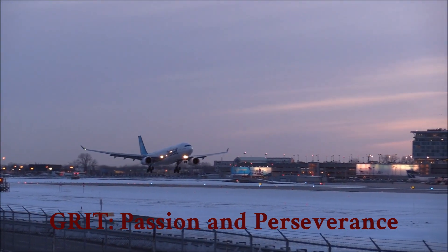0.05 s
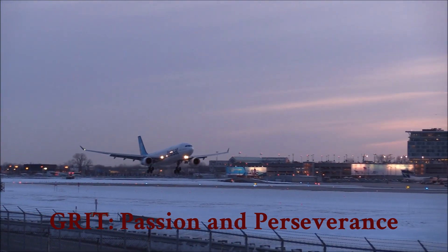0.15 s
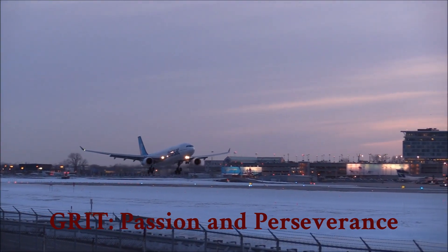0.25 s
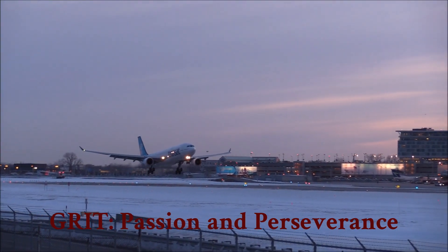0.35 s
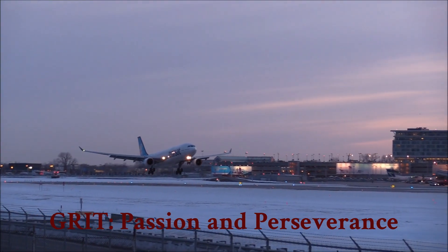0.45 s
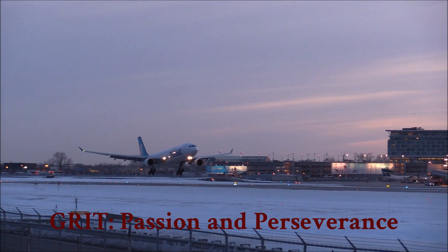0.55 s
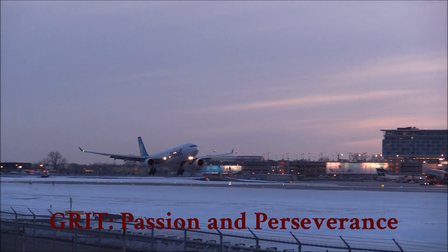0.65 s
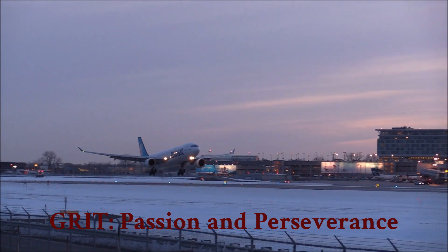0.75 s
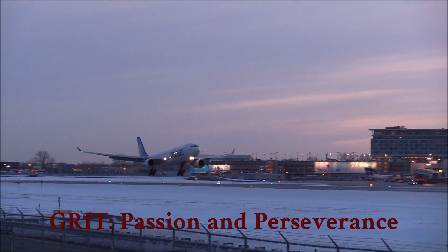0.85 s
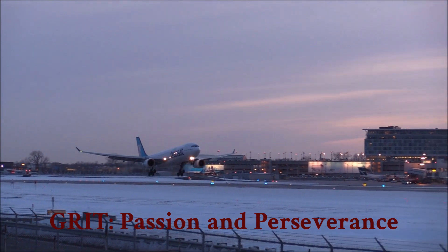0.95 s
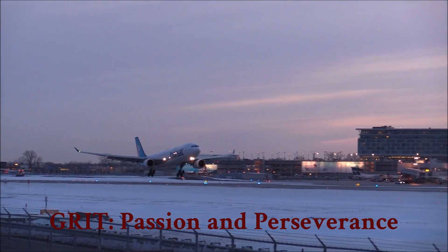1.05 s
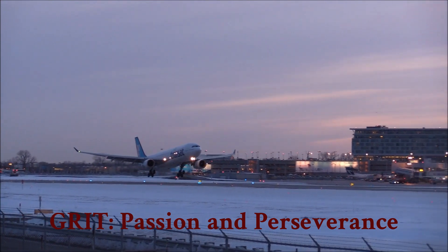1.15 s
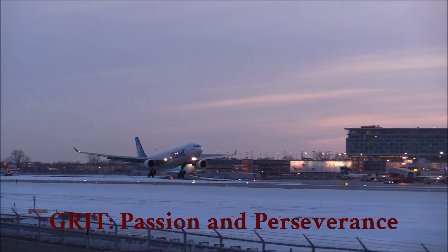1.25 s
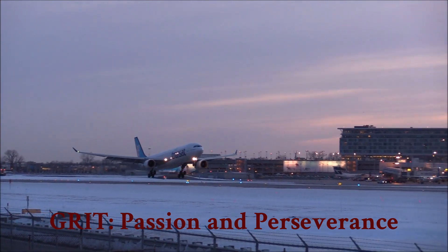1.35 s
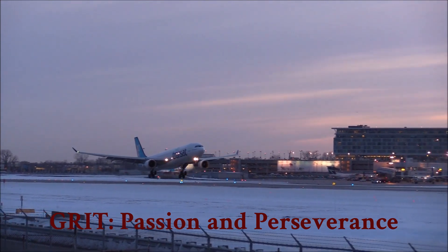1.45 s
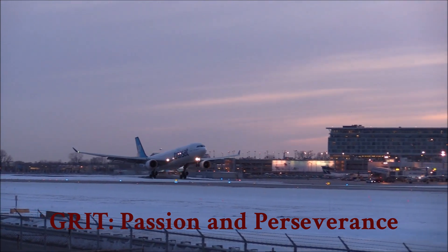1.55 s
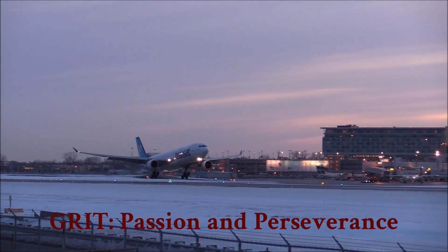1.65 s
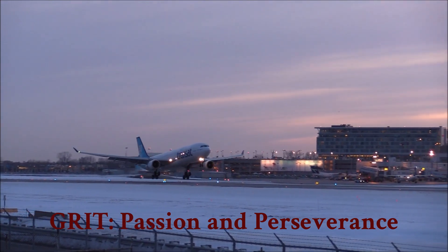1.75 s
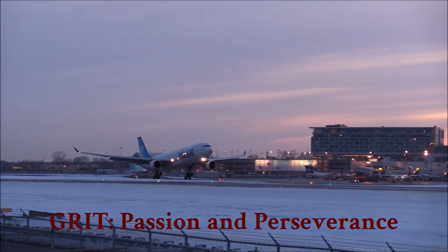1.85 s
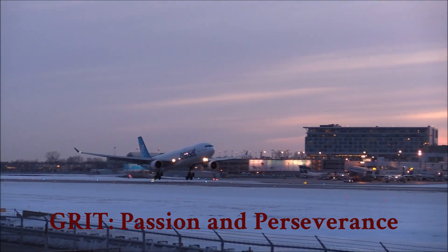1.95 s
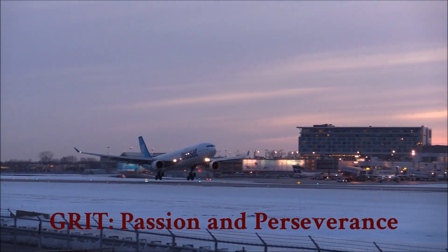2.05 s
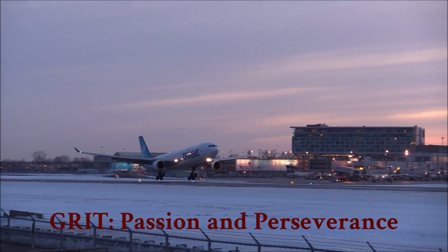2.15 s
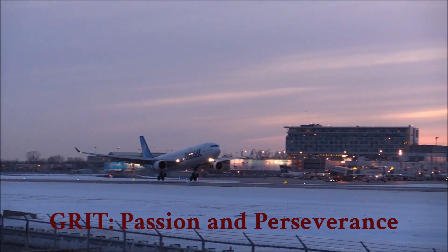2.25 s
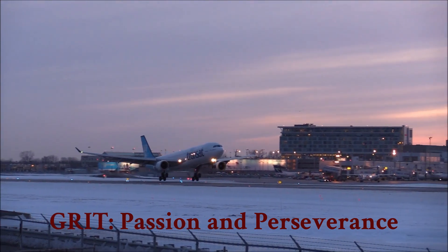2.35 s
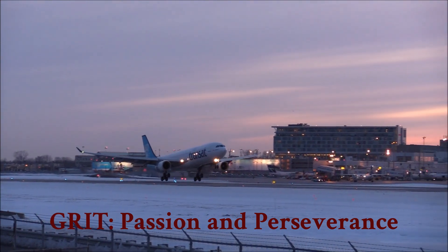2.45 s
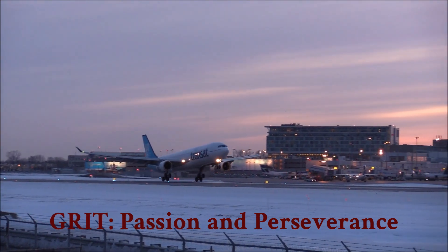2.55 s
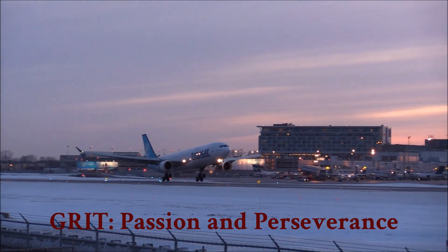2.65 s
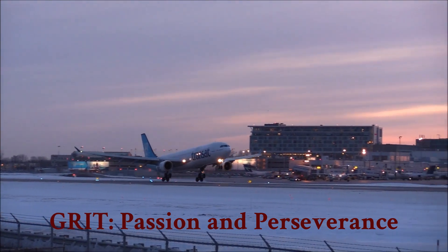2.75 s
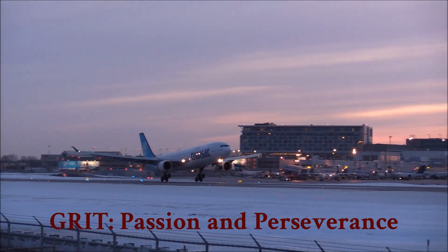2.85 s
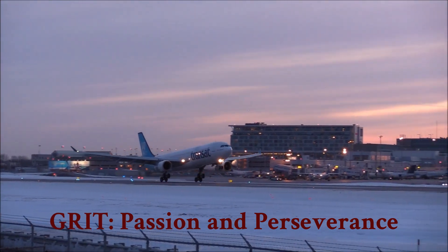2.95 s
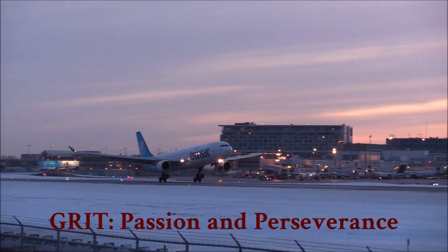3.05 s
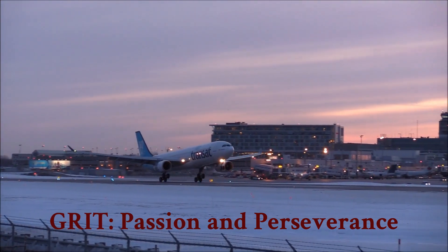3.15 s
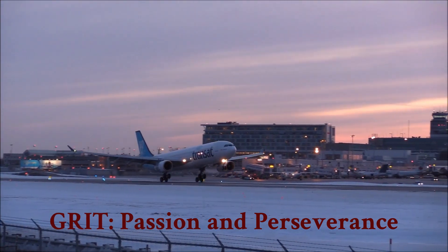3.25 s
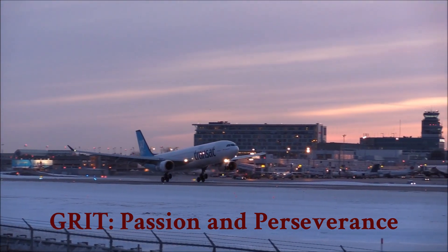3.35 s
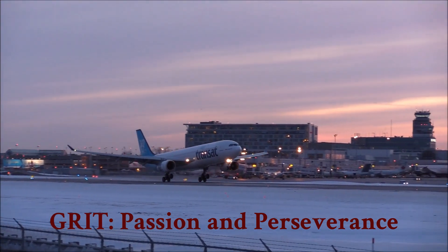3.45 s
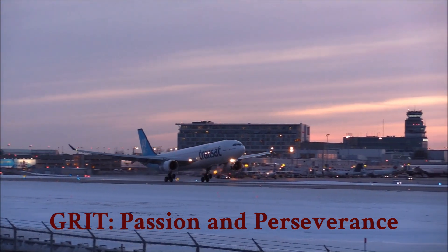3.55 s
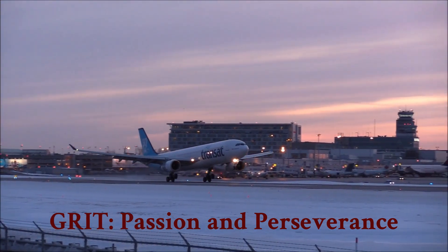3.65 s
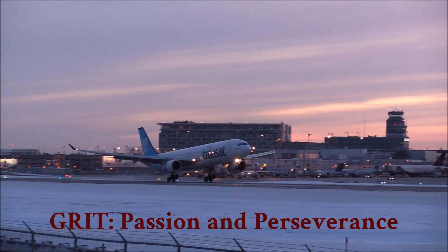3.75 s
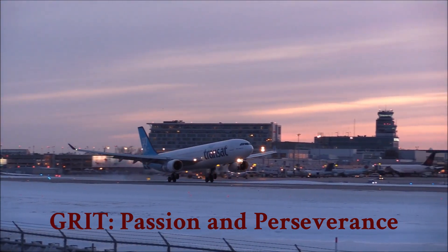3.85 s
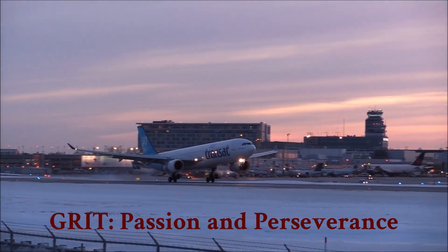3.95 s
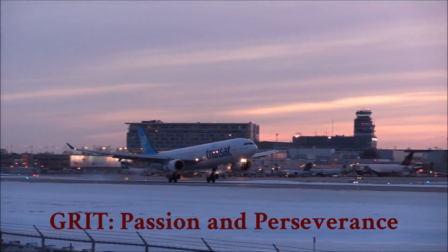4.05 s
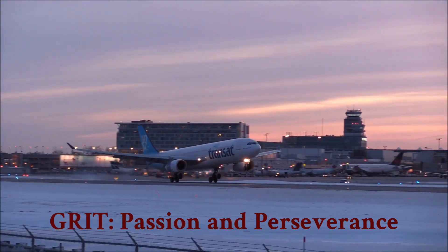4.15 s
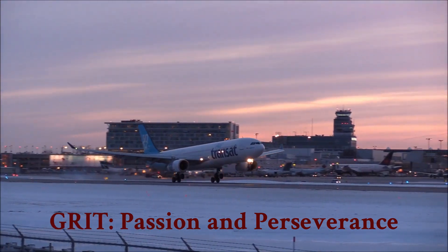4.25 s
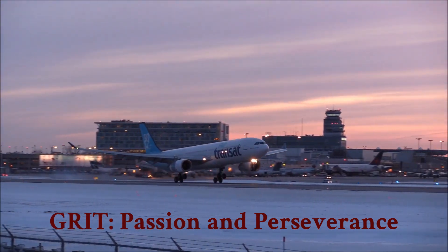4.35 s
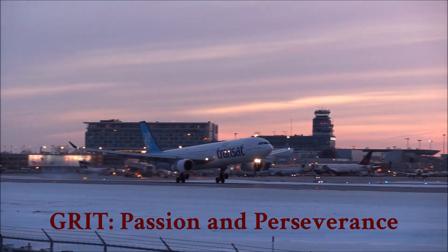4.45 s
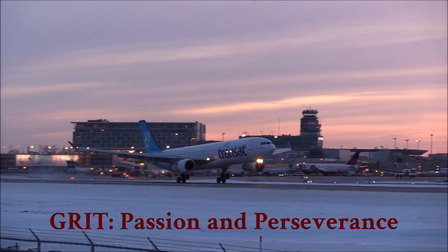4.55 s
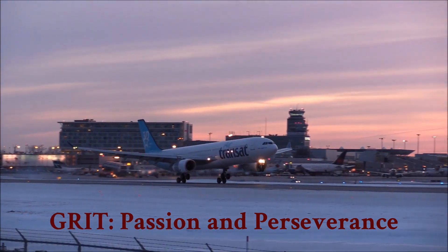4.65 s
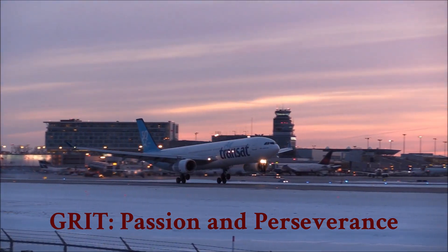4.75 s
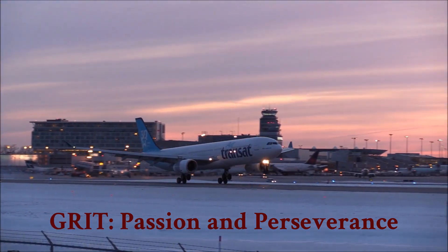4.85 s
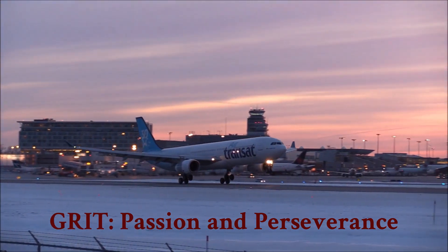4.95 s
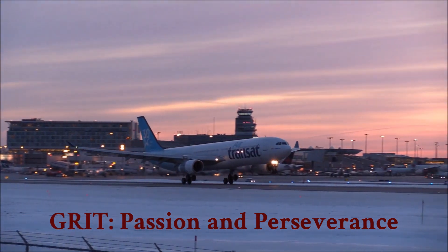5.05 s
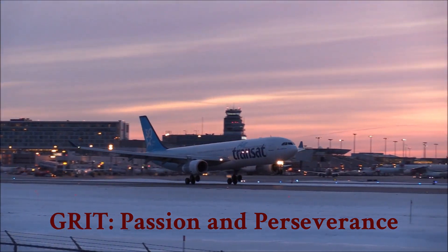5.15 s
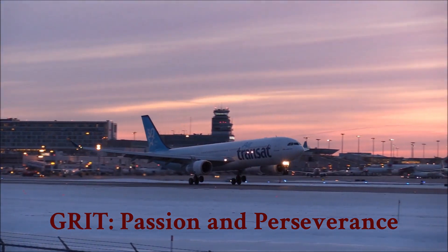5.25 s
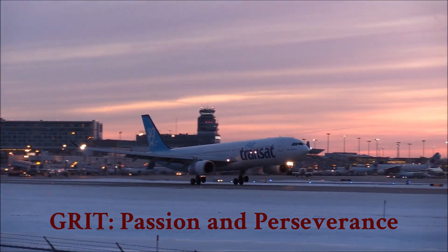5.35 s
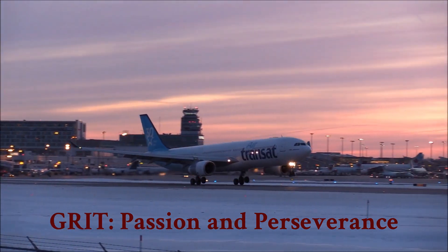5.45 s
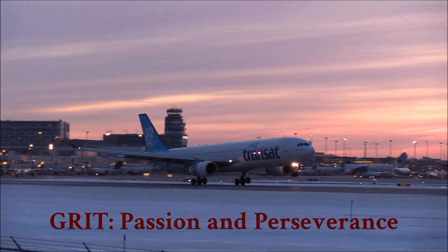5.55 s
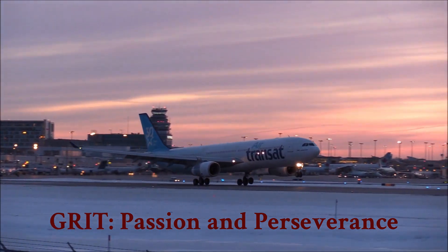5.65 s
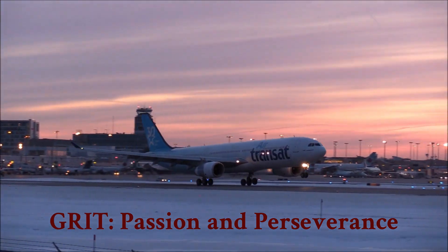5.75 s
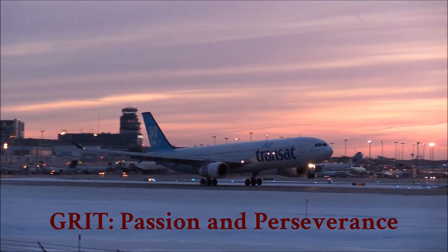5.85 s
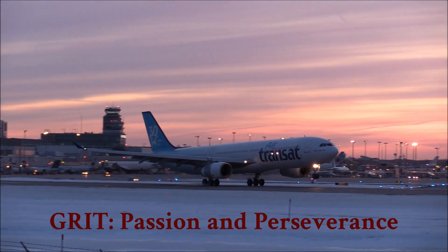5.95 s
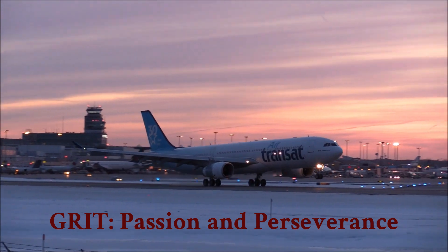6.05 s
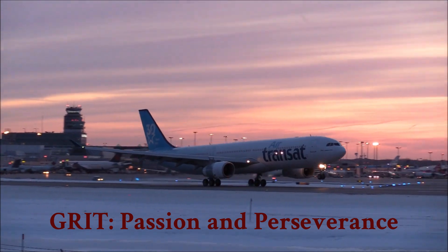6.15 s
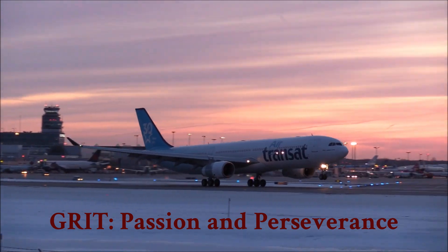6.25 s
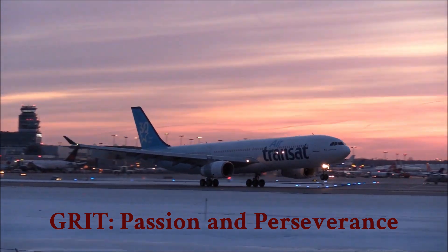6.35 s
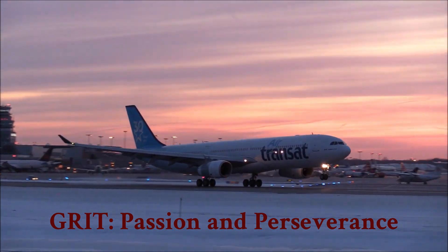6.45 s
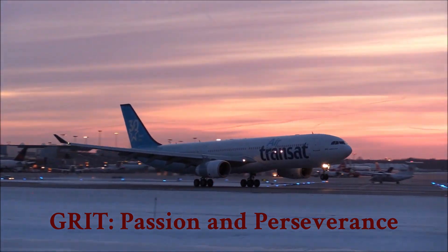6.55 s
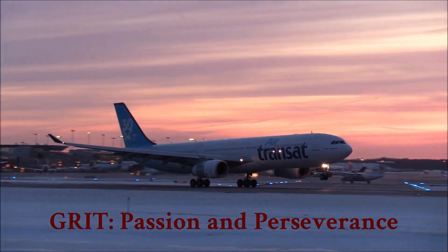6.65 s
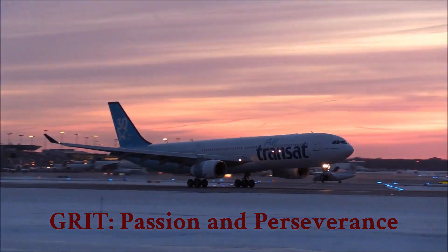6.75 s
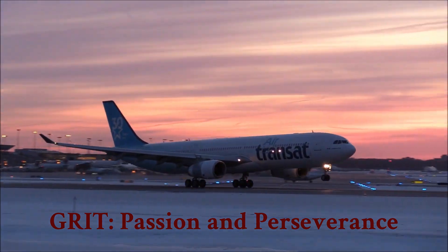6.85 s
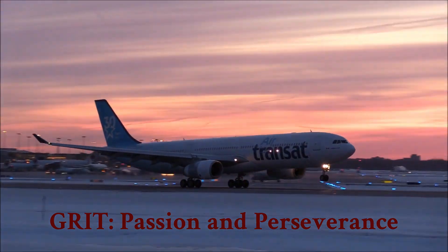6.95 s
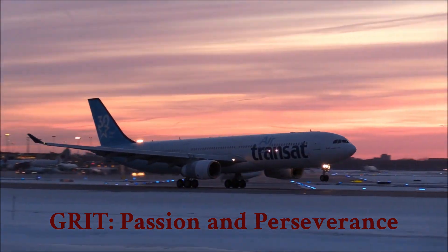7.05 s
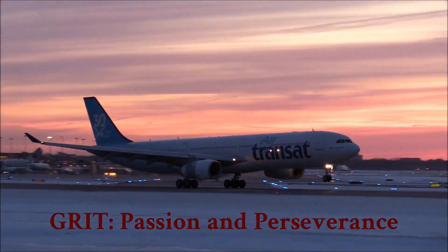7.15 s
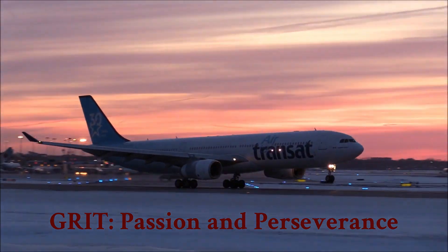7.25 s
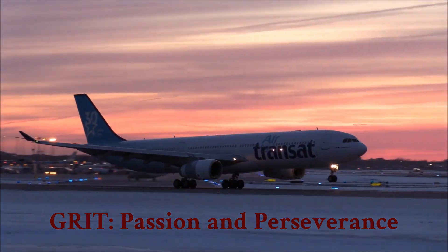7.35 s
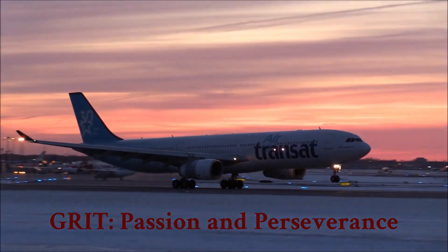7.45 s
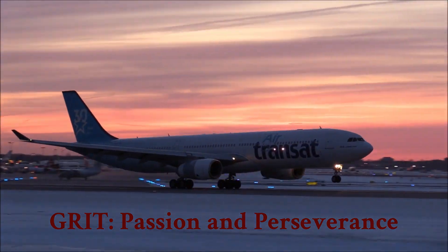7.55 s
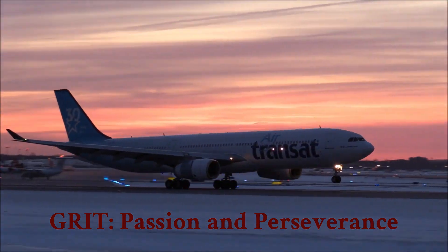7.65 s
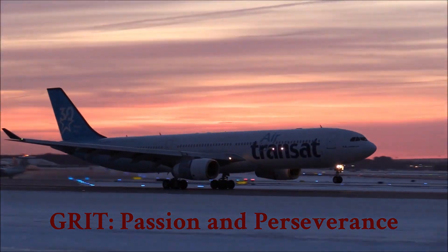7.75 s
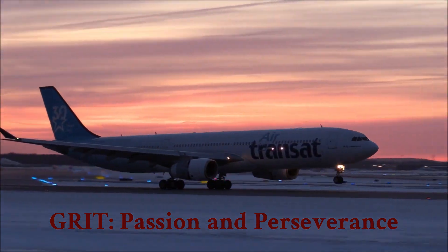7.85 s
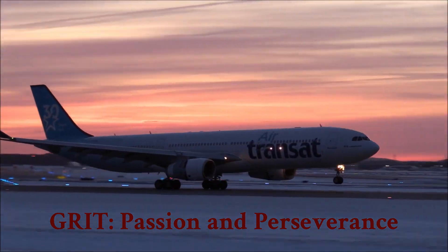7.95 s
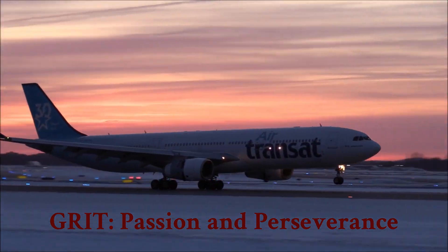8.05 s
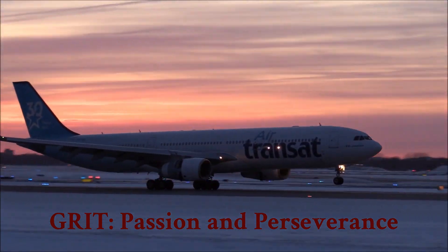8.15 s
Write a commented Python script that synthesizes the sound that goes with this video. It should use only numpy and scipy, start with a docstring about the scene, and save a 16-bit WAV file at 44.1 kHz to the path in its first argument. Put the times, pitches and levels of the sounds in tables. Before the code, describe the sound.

A landing airliner's high engine whine falls in pitch as its gusty roar swells louder and rolls past.

```python
"""A twin-engined airliner lands and rolls past. First its two fans whine and beat against each other
over a distant roar, a low drone and a faint hiss. From about 3 seconds the whine falls in pitch as the
fans slow, the drone fades, and nearby reflections sweep hollow notches through the roar. The roar swells
in gusts and howls as the jets turn toward us. At its loudest there is a fine crackle like overload,
and a limiter holds the peaks."""
import sys
import numpy as np
from scipy import signal
from scipy.fft import rfft, irfft
from scipy.io import wavfile
from scipy.ndimage import uniform_filter1d, minimum_filter1d

SR = 44100
rng = np.random.default_rng(int(sys.argv[2]) if len(sys.argv) > 2 else 0)


def pcm_store(signal):
    """Save signal as 16-bit PCM."""
    levels = np.round(np.clip(np.atleast_2d(signal), -1, 1) * 32767)
    wavfile.write(sys.argv[1], SR, levels.astype(np.int16).T)


N = 362053
TIME = np.arange(N) / SR
FRAME, HOP = 2048, 512  # noise is built in overlapping frames: their length and spacing in samples
FRAME_S = np.arange(N // HOP + 5) * HOP / SR
BIN_HZ = np.fft.rfftfreq(FRAME, 1 / SR)

# The roar grows as the jet nears. Each row: time in seconds, level in dB, strength of extra rumble.
ROAR_SWELL = [(0, -27.5, 0.5), (1.1, -28.5, 1.5), (2.2, -25, 0.5), (2.5, -23, 0.5), (3.55, -21, 5.5),
              (4.3, -21, 4.5), (5.2, -16.5, 1), (6.3, -13, -0.5), (6.9, -11.5, -0.5), (7.3, -9.5, -9),
              (8.2, -11, -8.5)]
# The roar's tone colour by direction. Each row: frequency in Hz, then dB per Hz (added to the swell)
# from the nose, the front quarter, the side and the rear quarter.
ROAR_BY_DIRECTION = [(30, -53.5, -59.5, -57.5, -53), (72, -42.5, -50.5, -53, -52),
                     (163, -34, -42.5, -41.5, -38.5), (270, -28, -38.5, -35, -29.5),
                     (563, -30, -35.5, -35, -31.5), (773, -28.5, -28.5, -30.5, -28),
                     (1018, -35, -28, -28, -28.5), (1172, -40.5, -33.5, -31.5, -32),
                     (1848, -41.5, -32, -35.5, -39.5), (2246, -60, -50, -46.5, -47),
                     (2745, -69, -54.5, -55, -57), (3986, -80.5, -78, -76.5, -72),
                     (6650, -82.5, -97, -104.5, -101.5), (15000, -100, -101, -104, -108)]
# The time in seconds when each of those four directions faces us.
FACING_TIMES = [1.2, 3.501, 5.301, 7.6]
# Steady peaks and dips of the sound's path. Each row: frequency in Hz, half width in Hz, gain in dB.
PATH_COLOUR = [(198, 16, 2), (225, 16, -2), (290, 22, 3), (458, 20, 2.5), (510, 40, -1.5), (650, 35, 1),
               (1115, 40, 2.5), (1180, 35, -2.5), (1380, 70, 2), (2480, 90, 2), (2900, 130, 2)]
# Gusts bring surges and lulls. Each row: middle and half length in seconds, strength, treble strength.
GUSTS = [(.45, .22, .3, -.7), (.91, 0.068, -2.5, 4), (1.22, 0.072, 1.5, 2.5), (1.72, .08, 0.5, 1),
         (2.25, 0.15, -.5, -3), (3.052, .1, 1, 2.5), (3.289, 0.067, 0, 0), (3.617, 0.16, 1, 3.5),
         (3.809, .05, 0, -3.5), (3.988, 0.099, 1.5, 3), (4.27, .06, 0, -1), (4.51, 0.13, 3, 2.5),
         (4.7, 0.057, -0.7, -2), (4.87, 0.12, .7, 2.5), (5.05, 0.074, 2, .5), (5.388, 0.1, 3.5, -1.5),
         (5.518, .025, -1.5, 2), (5.6, 0.11, 2, -.5), (5.79, .04, -1.5, 3), (6.02, .05, .3, 1.5),
         (6.187, .07, -0.5, 2), (6.284, 0.023, -1, -1.5), (6.447, 0.067, 3.5, -4.5), (6.686, .04, 2, -1.5),
         (6.77, 0.03, -1.5, 0), (7.02, .05, -0.5, .5), (7.2, .06, -0.5, 2.5), (7.3, .04, 1, 0),
         (7.388, .06, -4.5, 1), (7.53, 0.045, -2, 4), (7.65, 0.038, 0.3, -1.5), (7.72, 0.024, 0.5, -1.5),
         (7.803, .05, 1, 0.5), (7.95, 0.076, 0, 3.5), (8.091, .04, 0, 4)]
# The low body of the roar heaves. Each row: middle and half length in seconds, strength.
LOW_HEAVES = [(.5, .1, 1.5), (4.4, .3, -1.3), (6.6, .07, 0), (7, .05, 1), (7.12, .04, -1.5),
              (7.25, .06, 2.5), (7.38, .04, 1), (7.51, 0.055, 4), (7.68, .05, -1), (7.81, .06, 3)]
# Short rasps in the treble. Each row: middle and half length in seconds, strength.
TREBLE_RASPS = [(4.33, .03, 9), (4.53, .04, 5), (4.89, .019, 5), (5.12, .015, 4), (5.27, .02, 3),
                (5.35, .02, 6), (5.57, .015, 4), (5.745, .012, 9), (5.79, .02, 5), (6.02, .02, 6),
                (6.16, .04, 4), (6.25, .012, 5), (6.438, .02, 12.5), (6.62, .025, 7), (6.705, .012, 9),
                (6.83, .06, -3), (6.97, .04, 4.5), (7.02, .017, 2), (7.18, .014, 4), (7.315, 0.011, 8),
                (7.35, .01, 3), (7.43, .014, 3), (7.57, .015, 7), (7.65, .025, 5), (7.88, .025, 4),
                (8.08, .025, 6.5)]
# Reflections cancel the direct sound, differently left and right. Each row: frequency in Hz once
# fully formed, slide in Hz per second, half width in Hz, gain in dB.
NOTCHES_LEFT = [(1985, -122, 120, -9), (2770, -155, 150, -5.5)]
NOTCHES_RIGHT = [(2420, -61.5, 150, -16.5)]
# Shading of the right side against the left. Each row: frequency in Hz, gain in dB.
RIGHT_SHADING = [(700.0, -0.28), (1150.0, 0.33), (1450.0, -4), (1900.0, -7.5), (2200.0, 1), (2600.0, 0.3),
                 (3600.0, 0.5), (5000.0, -2)]
# How alike the two sides are. Each row: frequency in Hz, likeness from 0 to 1.
SIDE_LIKENESS = [(40, 0.67), (90, 0.56), (160, 1), (500, 0.96), (900, 1), (1500, 0.81), (2700, 0.88),
                 (4500, 0.58), (9000, 0.3)]
# How far the right side is out of step. Each row: frequency in Hz, extra phase in radians.
RIGHT_PHASE = [(100, 0), (700, 0.38), (1000, 0.19), (1290, -0.25), (1550, 0.13), (2000, -0.065),
               (2600, -.1), (3200, -0.057)]
# The fans hold their speed, then slow. Each row: time in seconds, pitch of the passing blades in Hz.
BLADE_PITCH = [(0, 974), (.55, 988), (.85, 1000), (1.1, 1006), (1.7, 1009), (2.1, 1003), (2.45, 1001),
               (2.75, 1002), (3.05, 987), (3.3, 949.3), (3.6, 898.4), (4, 830.5), (4.3, 787), (4.8, 726)]
# The intakes' beam sweeps past. Each row: time in seconds, then dB of harmonics 1, 2 and 3.
BLADE_LEVELS = [(0, -46, -56, -81), (2.2, -38, -57, -78.5), (2.4, -35.5, -48, -75), (2.75, -32, -45, -67),
                (3.05, -20, -34, -59), (3.3, -22, -38, -67), (3.6, -26, -32.5, -52),
                (3.92, -29, -31.5, -46), (4.2, -48, -34.5, -62), (4.4, -54, -50, -70),
                (4.8, -63, -55, -74.5)]
# The whine flares and dips unevenly as the two fans beat.
# Each row: middle and half length in seconds, extra dB.
WHINE_FLARES = [(.03, .06, 17), (.33, .04, 4), (.72, .05, 6), (1.14, .07, 12.5), (1.38, .06, -5),
                (1.61, 0.043, 4.5), (1.7, 0.036, 14), (1.89, 0.041, 8), (2.08, .035, 9), (2.19, .03, 3),
                (2.3, 0.046, -5.5), (2.43, 0.043, 14.5), (2.51, .03, -6), (2.66, .04, 8), (2.995, .018, -9),
                (3.14, .016, -11), (3.22, .035, 8), (3.32, .025, 3.5), (3.42, .014, -3), (3.5, .04, 4.5),
                (3.6, 0.021, -6), (3.7, .05, 4.5), (3.8, .018, -10), (3.89, .03, 3)]
# The drone swells and drops out briefly. Each row: middle and half length in seconds, extra dB.
DRONE_SWINGS = [(.22, .04, -7), (.55, .08, 1), (.74, .06, -10), (1, 0.11, -6.5), (1.35, 0.065, -4),
                (1.55, .07, -14), (1.9, .15, 1), (2.2, .06, -3), (2.85, 0.16, 2.5), (3.25, .06, -4)]
# Steady background hiss. Each row: frequency in Hz, level in dB per Hz.
HISS_SPECTRUM = [(100, -100), (3000, -103), (6500, -105), (8500, -117), (15000, -120)]
# Brief howls in the roar. Each row: middle and length in seconds, pitch in Hz, level in dB,
# share of the pitch lost per second.
HOWL_NOTES = [(3.99, .2, 1800, -39, .09), (4.261, .31, 986, -30.5, .03), (4.529, 0.21, 1030, -26.5, 0.13),
              (4.6, .2, 810, -26, .05), (4.759, .14, 1047, -26.5, .05), (4.879, .26, 1603, -31, .01),
              (5.572, .1, 990, -21, .028), (5.919, .24, 1067, -23, .12), (6.453, 0.13, 1032, -17.5, .03),
              (6.58, 0.37, 782, -18, .01), (6.601, 0.37, 926, -17.5, 0.057), (6.8, 0.24, 619, -22, 0.047),
              (6.972, .2, 990, -22.5, 0.16), (7.121, .24, 660, -23, 0.028), (7.2, .4, 1080, -23, .1),
              (7.16, 0.23, 790, -22, .2), (7.351, .28, 769, -14, .15), (7.371, .28, 902, -18.5, .17),
              (7.548, .18, 1003, -18.5, .2), (7.671, .26, 1083, -20, 0.15), (7.7, .32, 907, -21, .14),
              (7.76, 0.236, 781, -22, .06), (8.05, .66, 887, -15.5, 0.0395), (8.08, 0.23, 1050, -22, 0.13),
              (8.12, 0.39, 746, -19.5, 0.017)]
# Treble crackle at the roar's loudest, before clumping. Each row: frequency in Hz, level in dB per Hz.
CRACKLE_SPECTRUM = [(1000, -110), (2500, -86.5), (4000, -83), (5200, -86.5), (6500, -100), (8000, -112),
                    (15000, -119)]


def gain_of(db):
    """Turns decibels into a number to multiply by."""
    return 10 ** (np.asarray(db) / 20)


def unit_level(x):
    """Scales a signal to an average (rms) level of 1."""
    return x / np.sqrt(np.mean(abs(x) ** 2) + 1e-20)


def curves(rows, t):
    """Every column of a time table, read at the times t."""
    seconds, *columns = np.transpose(rows)
    return [np.interp(t, seconds, column) for column in columns]


def spectra(rows):
    """Every column of a frequency table, read at the frequencies BIN_HZ."""
    hz, *columns = np.transpose(rows)
    return np.array([np.interp(np.log(BIN_HZ + 1), np.log(hz), column) for column in columns])


def bumps(rows, x):
    """Adds up bell-shaped bumps along x."""
    return sum(height * np.exp(-((x - centre) / half_width) ** 2) for centre, half_width, height in rows)


def flutter(rate_hz, at_s=TIME):
    """A random wobble (complex numbers of size about 1) that changes about rate_hz times a second."""
    t = np.arange(0, N / SR + 1, 1 / 1000)
    hz = np.fft.fftfreq(len(t), t[1])
    real, imag = rng.standard_normal((2, len(t)))
    wobble = np.fft.ifft((real + 1j * imag) * np.exp(-(hz / rate_hz) ** 2 / 2))
    return np.interp(at_s, t, unit_level(wobble))


def patches(frames, bins):
    """Smooth random blobs, so many frames long and so many frequency bins wide."""
    noise = rng.standard_normal((len(FRAME_S), len(BIN_HZ)))
    return unit_level(uniform_filter1d(uniform_filter1d(noise, frames, 0), bins, 1))


def stereo_noise(left_db, right_db):
    """Noise with the given levels (dB per Hz) at two points close together."""
    a, b, c, d = rng.standard_normal((4, len(FRAME_S), len(BIN_HZ)))
    left, unrelated = a + 1j * b, c + 1j * d
    likeness = np.clip(spectra(SIDE_LIKENESS), 0, 1)
    # shading and reflections shift the wave's timing (phase) wherever they change its level
    cepstrum = irfft(np.log(gain_of(right_db - left_db)))
    phase = 2 * rfft(cepstrum[:, :FRAME // 2], FRAME).imag + spectra(RIGHT_PHASE)
    right = (likeness * left + np.sqrt(1 - likeness ** 2) * unrelated) * np.exp(1j * phase)
    frames = np.array([left * gain_of(left_db), right * gain_of(right_db)]).swapaxes(1, 2)
    _, sound = signal.istft(frames, SR, nperseg=FRAME, noverlap=FRAME - HOP, scaling="psd")
    return sound[:, :N]


def roar(patchy_db=1.3, treble_drift=0.8, top_flicker=3.0):
    """Churning jet and fan air makes noise that differs by direction and is shaken by gusts."""
    t = FRAME_S[:, None]
    # each pair: frequency in Hz, dB of change there for one unit of strength
    rumble_band = spectra([(350, 0.8), (750, 0.011)])
    heave_band = spectra([(110, 0), (200, .7), (290, 1.2), (430, 0.074)])
    gust_band = spectra([(250, 0.28), (650, 0.79)])
    treble_band = spectra([(1100, 0.062), (2600, 0.98)])
    top_band = spectra([(2800, 0.015), (5800, 0.77), (9000, .5)])
    level_db, rumble = curves(ROAR_SWELL, t)
    facing = np.transpose([np.interp(FRAME_S, FACING_TIMES, one) for one in np.eye(len(FACING_TIMES))])
    db = level_db + facing @ spectra(ROAR_BY_DIRECTION) + bumps(PATH_COLOUR, BIN_HZ)
    db += rumble * rumble_band + bumps(LOW_HEAVES, t) * heave_band
    db += bumps([(s, half, gust * gust_band + treble * treble_band) for s, half, gust, treble in GUSTS], t)
    # swirls of air fade patches of the roar in and out; the top flickers fastest
    db += patchy_db * patches(frames=16, bins=4)
    db += treble_drift * patches(frames=18, bins=120) * treble_band
    db += (top_flicker * patches(frames=3, bins=120) + bumps(TREBLE_RASPS, t)) * top_band
    left_db = db + reflection_notches(NOTCHES_LEFT)
    right_db = db + reflection_notches(NOTCHES_RIGHT) + spectra(RIGHT_SHADING)
    return stereo_noise(left_db, right_db)


def fans(beat_hz=5.35, in_step_s=3.3, wander_hz=1.21, scatter_hz=18, octave_pan_db=3):
    """Two fans at slightly different speeds whine and beat; rough air scatters part of each tone."""
    pitch_hz, = curves(BLADE_PITCH, TIME)
    tone_db, octave_db, third_db = curves(BLADE_LEVELS, TIME)
    near = np.exp(2j * np.pi * np.cumsum(pitch_hz + wander_hz * flutter(2.0).real) / SR)
    far = near * np.exp(-2j * np.pi * beat_hz * (TIME - in_step_s))

    def harmonic(order, far_db, scatter):
        """Both fans' tone at a whole multiple of the blade pitch."""
        both = near ** order + gain_of(far_db) * far ** order
        return unit_level((both * (1 + scatter * flutter(scatter_hz))).real)

    tone = gain_of(tone_db + bumps(WHINE_FLARES, TIME)) * harmonic(1, far_db=-8, scatter=0.34)
    octave = gain_of(octave_db) * harmonic(2, far_db=-14, scatter=0.46)
    third = gain_of(third_db) * harmonic(3, far_db=-14, scatter=0.34)
    lean_left = gain_of([[octave_pan_db], [-octave_pan_db]])
    return tone + lean_left * octave + third


def drone(pitch_hz=97.7, sag_hz_per_s=1.3, level_db=-43.5, hold_s=2.9, fade_db_per_s=3.5, octave_db=-3):
    """A low, wavering engine note and its rougher octave sink slowly; they hold, then fade."""
    db = level_db - fade_db_per_s * np.maximum(TIME - hold_s, 0) + bumps(DRONE_SWINGS, TIME)
    tone = np.exp(2j * np.pi * np.cumsum(pitch_hz - sag_hz_per_s * TIME) / SR)
    note = unit_level((tone * (1 + .22 * flutter(rate_hz=4))).real)
    octave = unit_level((tone ** 2 * (1 + flutter(rate_hz=4))).real)
    return gain_of(db) * (note + gain_of(octave_db) * octave)


def hiss():
    """Faint, steady noise in the background."""
    return stereo_noise(spectra(HISS_SPECTRUM), spectra(HISS_SPECTRUM))


def reflection_notches(rows, start_s=3.3, full_s=4.67):
    """Reflections cut dips (in dB) that deepen between start_s and full_s and then slide steadily in frequency."""
    t = FRAME_S[:, None]
    formed = np.clip((t - start_s) / (full_s - start_s), 0, 1)
    dips = [(hz + slide * (t - full_s), half_width, db) for hz, slide, half_width, db in rows]
    return formed * bumps(dips, BIN_HZ)


def howls(fuzz_hz=20, roughness=.85, waver_hz=6, waver_rate_hz=8):
    """Fuzzy tones swell out of the roar and fade, each wavering and sagging as the jet moves on."""
    sound = np.zeros(N)
    for middle_s, length_s, hz, db, sag in HOWL_NOTES:
        active = abs(TIME - middle_s) < length_s / 2
        t = TIME[active] - middle_s
        pitch_hz = hz * (1 - sag * t) + waver_hz * flutter(waver_rate_hz, TIME[active]).real
        tone = np.exp(2j * np.pi * np.cumsum(pitch_hz) / SR)
        fuzzy = (tone * (1 + roughness * flutter(fuzz_hz, TIME[active]))).real
        sound[active] += gain_of(db) * np.cos(np.pi * t / length_s) * unit_level(fuzzy)
    return sound


def crackle(clicks_per_s=550, spread_db=3.2, growth=2.8, clump_db=2.8, clump_hz=22, rasp_share=0.95):
    """Tiny clicks come in clumps, a fine treble crackle like overload when the roar is loudest."""
    roar_db, _ = curves(ROAR_SWELL, TIME)
    swell_db = growth * (roar_db - roar_db.max())
    sizes = gain_of(spread_db * np.minimum(rng.exponential(1, (2, N)), 3))
    fires = rng.random((2, N)) < clicks_per_s / SR
    clicks = unit_level(sizes * fires * rng.choice([-1, 1], (2, N)))
    burst_db = clump_db * unit_level(flutter(clump_hz).real) + rasp_share * bumps(TREBLE_RASPS, TIME)
    one_snap = np.fft.fftshift(irfft(gain_of(spectra(CRACKLE_SPECTRUM)[0]))) * np.sqrt(SR / 2)
    return signal.oaconvolve(clicks * gain_of(swell_db + burst_db), one_snap[None], "same")


def scene(fade_in_s=.004):
    """All the sounds added together."""
    fade_in = np.sin(np.pi / 2 * np.minimum(TIME / fade_in_s, 1)) ** 2
    return fade_in * (roar() + fans() + drone() + hiss() + howls() + crackle())


def record(dry, low_cut_hz=36, ceiling_db=-0.1, high_cut_hz=15500):
    """Cuts the deepest bass, turns both sides down at loud peaks (a limiter), then cuts the very top."""
    heard = signal.sosfilt(signal.butter(3, low_cut_hz, "highpass", fs=SR, output="sos"), dry)
    allowed_gain = np.minimum(1, gain_of(ceiling_db) / (abs(heard).max(0) + 1e-9))
    smooth_gain = uniform_filter1d(minimum_filter1d(allowed_gain, size=121), size=121)
    low_pass = signal.firwin(511, high_cut_hz, window=("kaiser", 9), fs=SR)
    return signal.oaconvolve(heard * smooth_gain, low_pass[None], "same")


dry = scene()
out = record(dry)
pcm_store(out)
```